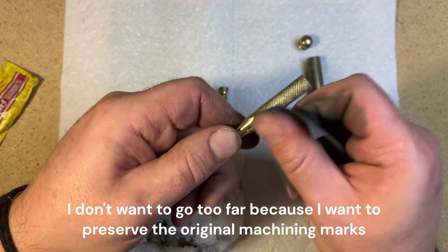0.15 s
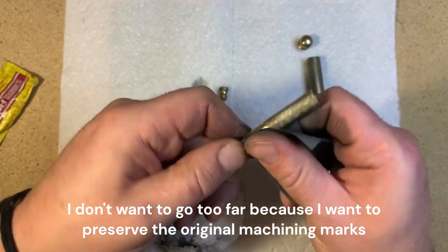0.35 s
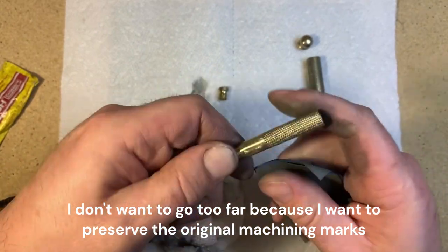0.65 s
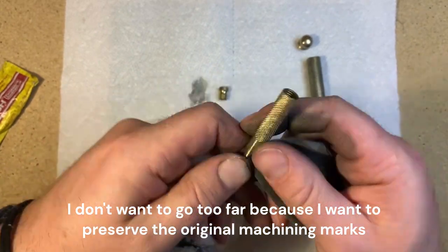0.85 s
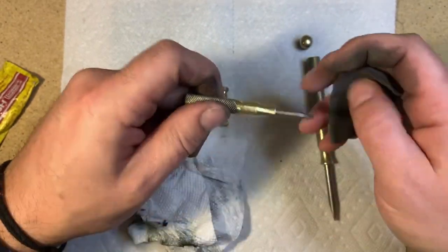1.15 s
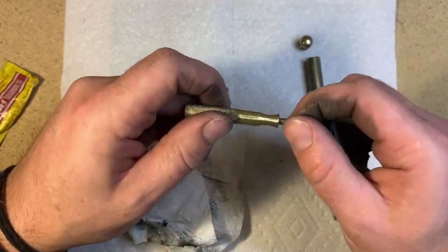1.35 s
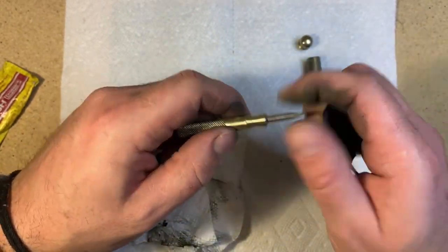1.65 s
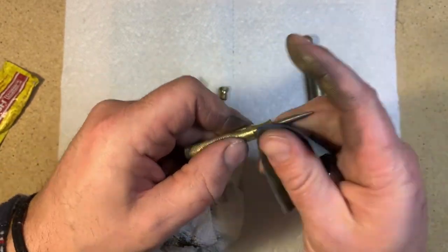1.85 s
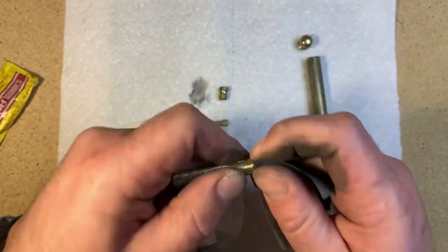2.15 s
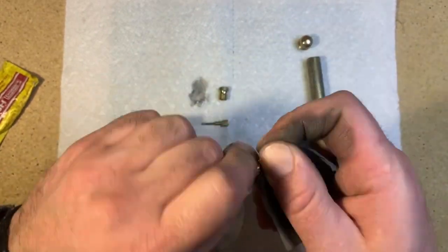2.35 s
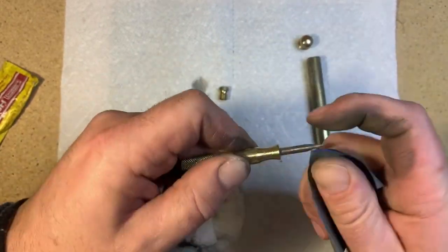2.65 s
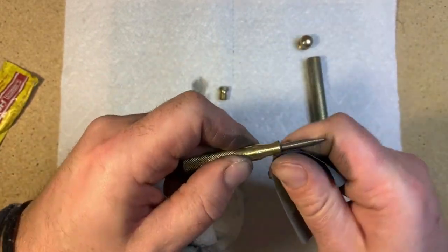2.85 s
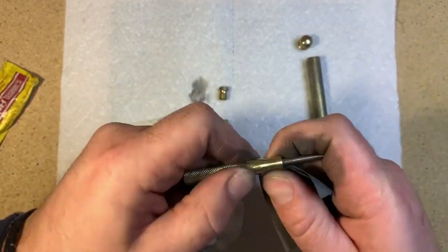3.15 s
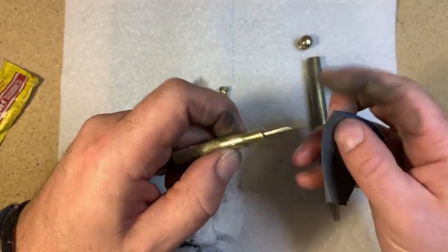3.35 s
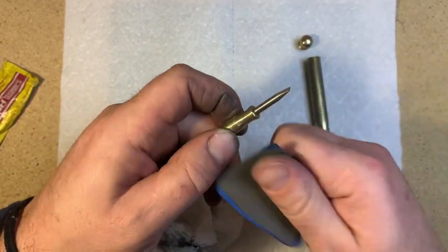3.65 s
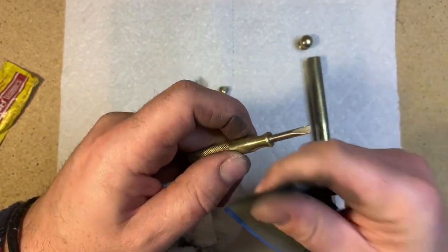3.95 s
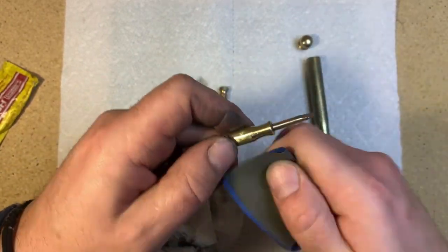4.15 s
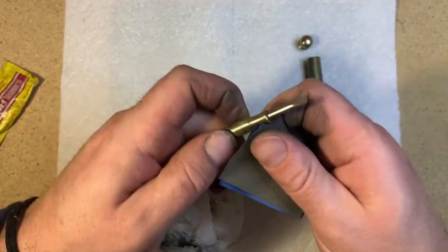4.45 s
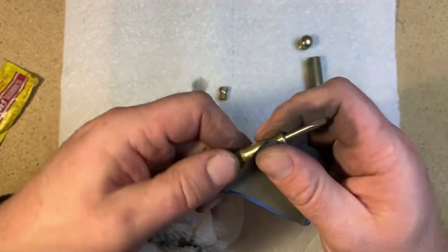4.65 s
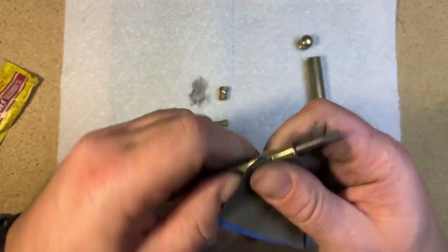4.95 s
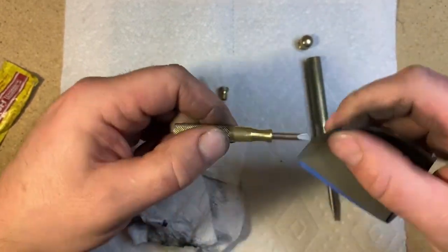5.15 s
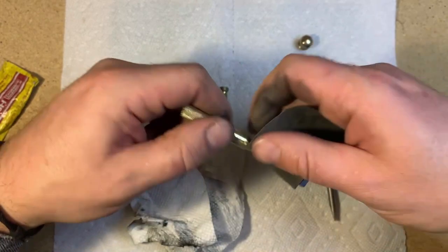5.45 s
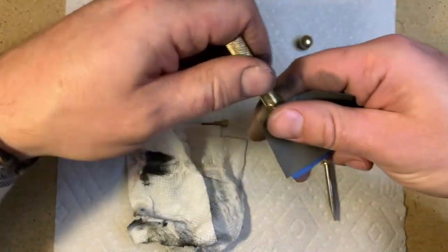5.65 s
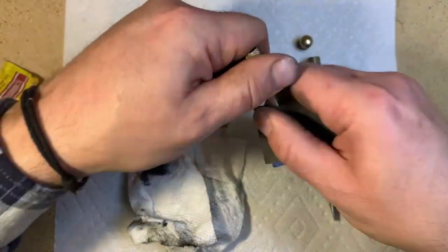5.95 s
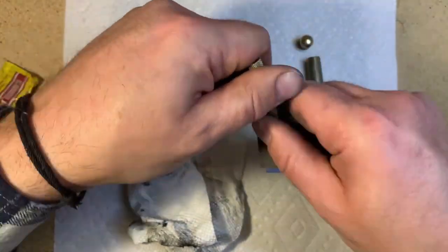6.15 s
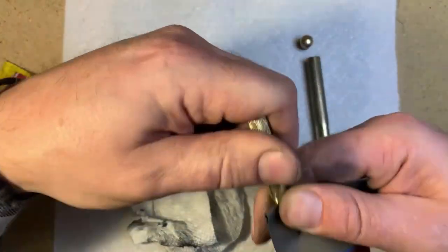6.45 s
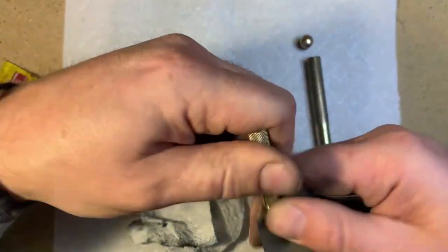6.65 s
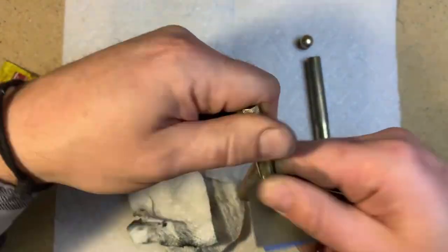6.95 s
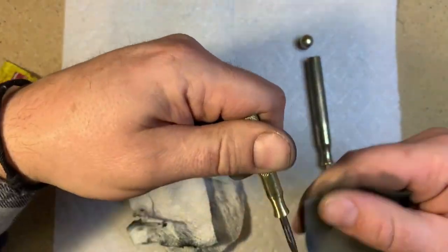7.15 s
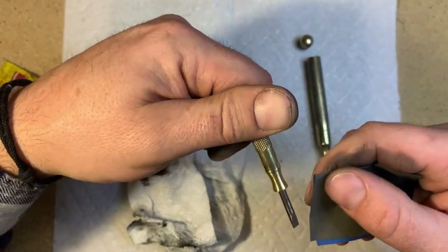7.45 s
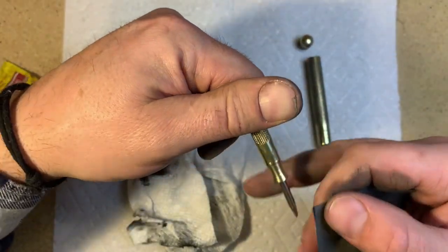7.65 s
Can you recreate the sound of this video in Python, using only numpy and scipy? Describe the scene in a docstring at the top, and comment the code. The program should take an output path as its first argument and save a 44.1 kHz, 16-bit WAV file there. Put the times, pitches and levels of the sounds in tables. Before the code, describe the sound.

Close-up hand sanding of a small brass tool: scratchy bursts, tiny clicks and dull knocks, a short pause, then steady duller strokes that stop.

```python
"""Fine sandpaper is worked over a small brass tool held in the fingers, heard from close by in wide stereo.
A drone, rumble and growl swell first, with an early bench knock; then short scratches bring sharp catches
and taps on the tool. After a short pause the scratching returns, with more catches and knocks, and it turns
to duller, evenly spaced strokes before it stops. A faint tap, then one last catch and tap, end it over hiss.
Noise grains ring the tool and paper, decaying tones make knocks and taps, and tone and noise fill the room."""
import sys
import numpy as np
from scipy import signal
from scipy.fft import rfft, irfft, next_fast_len
from scipy.io import wavfile
from scipy.ndimage import uniform_filter1d

SR = 44100
rng = np.random.default_rng(int(sys.argv[2]) if len(sys.argv) > 2 else 0)


def magnitude_from_level(level_db):
    """Linear magnitude for a level in decibels (20 dB per decade)."""
    exponent = np.asarray(level_db, float) / 20
    return 10 ** exponent


def unload_wav(signal):
    """Save mono or channel-first audio to the path in sys.argv[1] as 16-bit WAV at rate SR, clipped to [-1, 1]."""
    wavfile.write(
        sys.argv[1],
        SR,
        np.round(np.clip(np.atleast_2d(signal).T, -1, 1) * 32767).astype(np.int16),
    )


N = 343097
T = np.arange(N) / SR  # time of each sample in seconds
PAD = next_fast_len(N)
HZ = np.maximum(np.arange(PAD // 2 + 1) * SR / PAD, 1)  # frequencies used by the filters

# Smooth room hiss. Each row: frequency in Hz, level in dB per Hz.
HISS_SPECTRUM = [(250, -97), (350, -107), (900, -111), (1900, -114), (2900, -120), (5800, -126),
                 (9000, -127), (12000, -125), (15000, -128)]
# Swells of the low room layers. Each row: peak in seconds, level in dB, rise in ms, fall in ms.
DRONE_SWELLS = [(0.1, -52.5, 68, 26), (0.3, -43.5, 52, 132), (0.73, -53, 120, 160), (1.2, -66, 65, 100),
                (2.0, -61.5, 60, 27), (2.84, -64, 104, 31), (3.42, -62.5, 72, 53), (4.14, -69, 190, 60),
                (5.1, -70.5, 250, 200)]
RUMBLE_SWELLS = [(0.0, -52.5, 50, 150), (0.32, -58, 100, 120), (0.59, -56, 50, 80), (0.89, -60.5, 101, 120),
                 (1.21, -61, 80, 100), (1.9, -59.5, 60, 100), (2.32, -65.5, 100, 150),
                 (4.44, -61.5, 60, 204.3), (5.1, -62.5, 150, 200)]
GROWL_SWELLS = [(0.08, -57, 150, 130), (0.52, -62, 120, 120), (1.2, -70.5, 292.5, 200), (2.01, -59, 25, 35),
                (2.88, -57, 120, 51), (5.03, -72, 154, 150), (7.21, -68.5, 200, 200)]
# Dull knocks on the bench. Each row: time in seconds (the swell begins 2.8 ms earlier), level in dB, # extra
# level of the lowest modes in dB, length in ms for a mode near 745 Hz.
KNOCKS = [(0.142, -24, -20, 13.7), (0.633, -47, -11, 10), (0.762, -52, -25, 24),
          (2.003, -24.5, -19.5, 13.9), (2.327, -52, -9.5, 15), (2.386, -54.5, -7, 13),
          (2.47, -51.5, -8, 10.5), (3.213, -53, -25, 13), (3.286, -53.5, -9, 8.2), (3.643, -45.5, -16, 14),
          (4.37, -51, -10, 12), (4.45, -44, -25, 7.6), (4.681, -63, -10, 20), (4.925, -47, -8, 15.5),
          (5.006, -26.5, -21, 10.3), (5.783, -61, 1, 19), (6.611, -50, -3.5, 19), (6.984, -61.5, 5.5, 16),
          (7.159, -45.5, -17, 8.3)]
# Tones of the bench. Each row: frequency in Hz, level in dB, share of the knock's extra low level (0 to 1).
BENCH_MODES = [(247, -2.5, 0.7), (342.4, 1, 1), (739, -6.5, 0.09), (547, -10, 0.5), (900, -15.5, 0.03),
               (1290, -21.5, 0.07), (1670, -22.5, 0.2), (2100, -38.5, 0)]
# Taps on the tool. Each row: start in seconds, level in dB.
TAPS = [(0.762, -39), (1.1726, -48), (7.51, -71.5), (7.693, -50)]
# Tones of the tapped tool. Each row: frequency in Hz, level in dB, time to fall by 60 dB in seconds.
TAP_MODES = [(1140, -9, .016), (1647, -0.5, .018), (2070, -5, .014), (3300, -2, .018), (3700, -5, .012)]
# Sandpaper strokes. Each row: middle in seconds, length in ms, scratch level in dB, brightness in dB.
STROKES = [(0.013, 38, -73.5, 13.5), (0.058, 17.5, -61, 11), (0.098, 17, -64, 12.5),
           (0.125, 19, -61.5, 4.5), (0.169, 42, -57, 9), (0.214, 10, -65, 5), (0.257, 75, -61.5, 9),
           (0.383, 55, -57.5, 9.5), (0.46, 31, -52, 7), (0.546, 58, -47.5, 2.5), (0.609, 24.5, -46, 9),
           (0.63, 20, -42.5, 3), (0.682, 47, -69.5, -4.5), (0.765, 13.7, -50, -8.5), (0.854, 13, -66, 10),
           (0.89, 8.1, -58.5, -7), (0.953, 28, -62.5, 2), (0.996, 30, -51, 10.5), (1.072, 13, -45.5, -9.5),
           (1.095, 34, -46.5, -3), (1.125, 14.6, -33.5, -3), (1.165, 44, -50, 7), (1.232, 29, -49, 1),
           (1.683, 50, -55, -2), (1.743, 24, -53, -4.5), (1.767, 44, -54, 8.5), (1.812, 14, -55, -9),
           (1.841, 14, -40, -0.5), (1.883, 11, -76, 15), (1.981, 44, -55.5, 8), (2.038, 44, -52.5, 7),
           (2.106, 33, -56.5, 5.5), (2.164, 33, -52.5, 3.5), (2.218, 29, -43, -13), (2.256, 30, -52.5, -4),
           (2.284, 55, -54.5, 8), (2.332, 11, -41.5, -10.5), (2.353, 33, -52.5, 14.5), (2.39, 4, -39.5, -9),
           (2.422, 48, -51.5, 3.5), (2.487, 34, -47.5, 3), (2.562, 55, -54, -2), (2.644, 57, -69, 7.5),
           (2.722, 38.5, -52, -16), (2.767, 18, -53, -5.5), (2.796, 20, -56.5, -15), (2.823, 22, -60.5, -9),
           (2.862, 33, -51.5, 2), (2.911, 58, -54.5, -9.5), (2.961, 30, -49.5, -4), (3.003, 25, -48, -12.5),
           (3.084, 57, -44, -13), (3.167, 46, -46, 4), (3.213, 16.5, -48, -1.5), (3.254, 15, -63, 4),
           (3.283, 20.4, -50, -2.5), (3.338, 38, -61, 12.5), (3.402, 17, -78, 17.5),
           (3.45, 23.3, -43, -5.5), (3.481, 48, -55, 9), (3.549, 43, -57.5, 5.5), (3.582, 29, -65, 16.5),
           (3.641, 55, -51, 3), (3.696, 50, -55.5, 15), (3.768, 33, -65.5, 22), (3.802, 31, -66, 13),
           (3.915, 31, -75, 24), (4.003, 46, -64, 11), (4.041, 20, -68, -1), (4.081, 38.5, -52.5, -3),
           (4.126, 30, -54, 7.5), (4.182, 46, -53, 0.5), (4.258, 57, -62, 11), (4.308, 35, -58, 16),
           (4.339, 11, -58.5, 0), (4.379, 22.4, -40.5, 4.5), (4.4, 7.2, -47.5, 2), (4.452, 39, -51, 1),
           (4.515, 21, -54, 10), (4.56, 25.5, -56, 1), (4.597, 25, -57.5, 6.5), (4.658, 11, -71, 10),
           (4.712, 50, -45.5, 3.5), (4.809, 90, -54, 2.5), (4.881, 29.4, -46, -6.5), (4.926, 44, -48, 9),
           (4.99, 47.6, -50.5, 3.5), (5.073, 28, -57, 7), (5.109, 41, -53, 1), (5.171, 86, -52.5, 2.5),
           (5.218, 19, -48, -2.5), (5.277, 20, -48.5, -8), (5.316, 41, -47, -0.5), (5.374, 41, -52, -4),
           (5.469, 30, -56.5, 7.5), (5.53, 47, -55, -6), (5.561, 8.2, -62, -15), (5.606, 41, -52, 0),
           (5.655, 19, -65, 3.5), (5.706, 36, -56, 0), (5.788, 35, -39.5, -4), (5.84, 24, -54.5, -23),
           (5.882, 27, -62, -1), (5.944, 38.6, -40.5, -5), (5.998, 17, -53.5, -8), (6.023, 17, -42, -18),
           (6.058, 40, -39, -10), (6.154, 44, -40.5, -10), (6.256, 43.7, -42.5, -8),
           (6.357, 39, -42.5, -5.5), (6.453, 42, -43.5, -7.5), (6.537, 48, -44, -7.5),
           (6.629, 53, -43, -9.5), (6.693, 24, -41.5, -15.5), (6.728, 40, -48, -3.5),
           (6.814, 46, -46.5, -3.5), (6.889, 62, -47.5, -8), (6.976, 71, -53.5, 0), (7.071, 29, -69, 6.5),
           (7.15, 50, -57.5, 5.5), (7.253, 16, -68.5, -2), (7.697, 9.8, -48.5, -4)]
# The paper catches on an edge or lands suddenly. Each row: start in seconds, level in dB, length in ms.
CATCHES = [(0.348, -62, 35), (0.444, -56, 14), (0.6064, -43.5, 0.72), (0.6157, -40.5, 1.5),
           (0.632, -28, 1.3), (0.648, -36, 2.9), (0.763, -25, 0.7), (0.775, -62, 80), (0.845, -67, 36),
           (0.9952, -43, 1.5), (0.9992, -43, 1.4), (1.119, -35, 18), (1.1244, -30.5, 2.3),
           (1.1724, -37, 1.9), (1.739, -42, 9.1), (1.8484, -25, 1.3), (2.204, -40, 30), (2.2546, -33, 2.6),
           (2.327, -43.5, 23), (2.387, -29, 0.84), (2.467, -46.5, 16), (3.213, -32.5, 2.3),
           (3.2906, -35, 1), (3.443, -52, 20), (3.6424, -36, 2.84), (3.895, -66.5, 120), (4.371, -37.5, 25),
           (4.373, -28, 2), (4.3833, -30.5, 1.5), (4.3996, -20.5, 0.83), (4.405, -42, 1.6),
           (4.5039, -42, 0.69), (4.5187, -43, 1.5), (4.6827, -39, 1.9), (4.8917, -34.5, 1.3),
           (5.094, -41, 2.1), (5.196, -34, 1.9), (5.7838, -34, 1.9), (5.7914, -22.5, 1.6),
           (5.803, -32.5, 1.3), (5.949, -33, 0.76), (6.019, -49.5, 8), (6.047, -41, 1.5),
           (6.0572, -53, 1.2), (6.6102, -40, 1.2), (6.79, -31.5, 1.5), (6.808, -41, 1.3),
           (7.1593, -40, 1.1), (7.693, -43, 14), (7.715, -60, 30)]
# Resonances of hand, tool and folded paper, by band. Each row: frequency in Hz, width in Hz, level in dB.
TOOL_BANDS = {"cavity": [(520, 1000, -1.5), (1277, 720, -7)], "low scrape": [(1904, 740, 0.5)],
              "rasp": [(2977, 970, -1)], "scratch": [(3674, 830, -7.5), (4040, 960, -6.5)],
              "upper": [(5270, 1800, -8), (6180, 2260, -5.5), (6810, 2240, -6.5)], "top": [(8990, 3350, -5),
              (10160, 2800, -4.5), (12230, 2200, -5.5), (14500, 1800, -12.5), (15260, 1500, -8.5)]}
# How the hands hold tool and paper. Each row: time in seconds, cupping in dB (each lower band takes # its own
# share), angle of the tool in dB.
GRIP = [(0.0, 3, 6.5), (0.4, 2.5, 0.5), (0.76, 4, -3), (1.2, -2.5, 1), (1.9, 0, 0.5), (2.5, -1, -3),
        (2.9, -5, -4.5), (3.25, -1.5, -2.5), (3.6, 2, 1), (4.1, 3, 1.5), (4.4, 3.5, 1), (4.7, 5, 1.5),
        (5.2, 0, 3), (5.55, 0, 2.5), (5.9, -0.5, 3), (6.4, -1.5, 7), (6.8, -1.5, 8), (7.2, 5, -0.5),
        (7.7, -3, 1)]
# Right channel against left, on top of a plain delay. Each row: frequency in Hz, phase lead in radians.
CHANNEL_LEAD = [(20, 0), (120, .4), (260, 1.5), (700, 2.1), (2100, 2.2), (2400, 2.3), (3300, 3.75),
                (16000, 3.85)]
# Right channel against left. Each row: frequency in Hz, level difference in dB.
CHANNEL_DB = [(20, 0), (280, -1), (450, 0), (800, 3), (1100, 1.2), (2300, 2.2), (4200, .1), (16000, 0)]
# Random wander of the phase between the channels, most in the middle frequencies.
# Each row: frequency in Hz, level of the wandering part in dB against the sanding and room sound.
PHASE_WANDER = [(20, -29.5), (400, -4.5), (1200, 1.5), (1800, -3), (2300, -1.5), (4000, -18.5), (9000, -22),
                (16000, -26)]


def on_hz(table):
    """Read a (Hz, value) table on a log-frequency axis."""
    hz, value = np.transpose(table)
    return np.interp(np.log(HZ), np.log(hz), value)


def shape(x, gain):
    """Filter by a complex gain per frequency."""
    return irfft(rfft(x, PAD) * gain, PAD)[..., :N]


def ring(x, modes):
    """Ring steep resonances that answer only after the push; white noise of rms 1 comes out near rms 1."""
    gain = 0
    for k, (hz, width, db) in enumerate(modes):
        # neighbouring modes take opposite signs
        gain = gain + (-1) ** k * magnitude_from_level(db) / (1 + 1j * (HZ - hz * hz / HZ) / width) ** 2
    return shape(x, gain / np.sqrt(np.mean(abs(gain) ** 2)))


def walk(rate):
    """Random levels, `rate` of them a second, smoothed twice; their spread is near 1."""
    hold = int(SR / rate)
    steps = np.repeat(rng.standard_normal(N // hold + 1), hold)
    return 1.09 * uniform_filter1d(uniform_filter1d(steps, hold), hold)[:N]


def swelling(rest_db, wander_db, swells):
    """Gain that wanders about a slowly falling resting level and swells now and then."""
    fade_db_per_s = 0.44
    power = magnitude_from_level(rest_db - fade_db_per_s * T + wander_db * walk(4.5)) ** 2
    for at, db, rise, fall in swells:
        ms = 1000 * (T - at)
        power = power + magnitude_from_level(db) ** 2 * np.exp(-(ms / np.where(ms < 0, rise, fall)) ** 2)
    return np.sqrt(power)


def room():
    """A narrow wavering drone, deep rumble and growl come and go as resonant noise and tone, over smooth hiss."""
    drone_hz = 87 + 6.0 * walk(14)
    drone = np.sqrt(2) * np.sin(2 * np.pi * np.cumsum(drone_hz) / SR) * magnitude_from_level(2.3 * walk(16))
    rumble = ring(rng.standard_normal(N), [(64.3, 30.6, 12), (33, 23, -6.5)])
    growl = ring(rng.standard_normal(N), [(134.5, 59, 6.0), (205.2, 80, -4.5)])
    low = swelling(-72.5, 1.5, DRONE_SWELLS) * drone
    low = low + swelling(-64.5, 1.5, RUMBLE_SWELLS) * rumble
    low = low + swelling(-70, 1, GROWL_SWELLS) * growl
    low_cut = np.minimum(HZ / 250, 1) ** 2
    hiss = shape(rng.standard_normal(N), magnitude_from_level(on_hz(HISS_SPECTRUM)) * np.sqrt(SR / 2) * low_cut)
    return low + hiss * magnitude_from_level(1.3 * walk(6))


def bench():
    """Soft knocks: the modes swell during the push and the resting arms damp them, the lowest last."""
    push_ms, rise_ms, linger = 2.8, 5.1, 0.26  # linger: how much longer low modes last
    out = np.zeros(N)
    t = np.arange(int(.05 * SR)) / SR
    ms = 1000 * t
    for at, db, low_db, length_ms in KNOCKS:
        start = int((at - push_ms / 1000) * SR)
        for k, (hz, mode_db, low_share) in enumerate(BENCH_MODES):
            damping = np.exp(-(ms / max(length_ms, 3) * (hz / 745) ** linger) ** 3.0)
            swell = np.minimum(ms / rise_ms, 1) * damping
            gain = (-1) ** k * magnitude_from_level(db + mode_db + low_share * low_db)
            out[start:start + len(t)] += gain * swell * np.sin(2 * np.pi * hz * t)
    return out


def taps():
    """Each tap in the fingers rings the damped modes of the held tool."""
    out = np.zeros(N)
    t = np.arange(int(.06 * SR)) / SR
    tap = sum(magnitude_from_level(db - 60 * t / t60) * np.sin(2 * np.pi * hz * t) for hz, db, t60 in TAP_MODES)
    for at, db in TAPS:
        start = int(at * SR)
        out[start:start + len(t)] += magnitude_from_level(db) * tap
    return out


def grit():
    """Dense grains of uneven size, in patches as the paper grips and lets go; rms 1."""
    scatter_db, patchy_db = 2.5, 2.0
    grain_db = scatter_db * rng.exponential(size=N) + patchy_db * walk(300)
    grains = rng.standard_normal(N) * magnitude_from_level(grain_db)
    return grains / np.sqrt(np.mean(grains ** 2))


def pressure():
    """Power with which the grit bites: broad-topped strokes that start and stop quickly, and catches."""
    strokes, catches = np.zeros(N), np.zeros(N)
    for at, length_ms, db, _ in STROKES:
        near = slice(max(int((at - .15) * SR), 0), int((at + .15) * SR))
        ms = 1000 * (T[near] - at)
        # the ends of the stroke's length lie about 6 dB below its middle
        strokes[near] += magnitude_from_level(db - 6.04 * abs(2 * ms / max(length_ms, 2)) ** 3.65) ** 2
    for at, db, length_ms in CATCHES:
        near = slice(int((at - .002) * SR), int((at + .09) * SR))
        ms = 1000 * (T[near] - at)
        # a catch snaps free at once, then dies away over its length
        fall = np.where(ms < 0, ms / 0.036, -ms / max(length_ms / 4, .05))
        catches[near] += magnitude_from_level(db) ** 2 * np.exp(fall)
    return strokes, catches


def snaps():
    """The brief catches let go with one sharp step in force."""
    crisp_db, brief_ms = 7.5, 3.0
    at, db, length_ms = np.transpose(CATCHES)
    out = np.zeros(N)
    out[(at * SR).astype(int)] = magnitude_from_level(db + crisp_db) * (length_ms < brief_ms)
    return out


def sliding(strokes):
    """The paper stays in light contact only where one stroke has just ended and the next is near."""
    slide_db, reach_ms = -6.5, 18
    keep = np.exp(-1000 / (reach_ms * SR))
    after = signal.lfilter([1 - keep], [1, -keep], strokes)
    before = signal.lfilter([1 - keep], [1, -keep], strokes[::-1])[::-1]
    return magnitude_from_level(2 * slide_db) * np.minimum(after, before)  # doubled because this is power


def band_levels():
    """Brightness, pressure and grip shift the weight between the resonances; dB for each band."""
    at, _, level_db, bright_db = np.transpose(STROKES)
    grip_at, cupping_db, angle_db = np.transpose(GRIP)
    extra = np.interp(T, at, level_db + 50)  # pressure against an ordinary stroke at -50 dB
    bright = np.interp(T, at, bright_db)
    cupping = np.interp(T, grip_at, cupping_db)
    # harder pressure favours the scratch over the lower bands; cupping lifts the lower bands
    return {"cavity": -21 - 0.28 * extra + 1.5 * cupping,
            "low scrape": -17.5 - 0.19 * extra + 0.6 * cupping,
            "rasp": -11.5 - 0.29 * extra + 0.18 * cupping,
            "scratch": 0,
            "upper": 0.62 * bright + np.interp(T, grip_at, angle_db),
            "top": bright}


def sanding():
    """The grit's strokes, catches and light slides ring tool and paper, with an echo from the bench top."""
    patchy_db, light_treble_db, snap_body_db = 2.15, -9.5, 3.5
    levels = band_levels()
    grains = grit()
    strokes, catches = pressure()
    light, snap = sliding(strokes), snaps()
    out, sign = 0, 1
    for band, modes in TOOL_BANDS.items():
        # light sliding is duller than a pressed stroke
        light_db = light_treble_db if band in ("upper", "top") else 0
        # a snap rings the lowest resonances harder than grit does
        snap_db = snap_body_db if band in ("cavity", "low scrape") else 0
        power = strokes + catches + light * magnitude_from_level(2 * light_db)
        bite = snap * magnitude_from_level(snap_db) + grains * np.sqrt(power)
        for hz, width, db in modes:
            push = bite * magnitude_from_level(db + levels[band] + patchy_db * walk(35))
            out = out + sign * ring(push, [(hz, width, 0)])
            sign = -sign
    # the bench top below throws back an echo whose path changes as the hands move
    lag_s = (1.313 + .3 * walk(8)) / 1000
    return out + magnitude_from_level(-10.0) * np.interp(T - lag_s, T, out)


def scene():
    """One mono sound is widened to two channels, the right delayed and phase-shifted, with random wander."""
    airborne = sanding() + room()
    # the phase between the channels wanders at random, most in the middle frequencies
    wander = shape(airborne, 1j * magnitude_from_level(on_hz(PHASE_WANDER))) * walk(30)
    sound = airborne + bench() + taps()
    # the plain delay makes one full turn of phase every 4250 Hz
    lag = np.exp(1j * (on_hz(CHANNEL_LEAD) - 2 * np.pi * HZ / 4250))
    tilt = magnitude_from_level(on_hz(CHANNEL_DB) / 2)  # half the level difference goes to each channel
    left = shape(sound + wander, 1 / tilt)
    right = shape(sound - wander, tilt * lag)
    return np.array([left, right])


def band_limit(x):
    """A steep low-pass at the top of the band."""
    return signal.sosfilt(signal.butter(12, 16990, fs=SR, output="sos"), x)


def record(dry):
    """Each channel adds its own faint hiss; the very top is shelved off steeply."""
    noisy = dry + magnitude_from_level(-92.5) * rng.standard_normal(dry.shape)
    # falls by 17 dB from 15750 to 15950 Hz, with nothing kept from 16550 Hz up
    shelf = magnitude_from_level(-17 * np.clip((HZ - 15750) / 200, 0, 1)) * (HZ < 16550)
    mix = shape(noisy, shelf)
    return band_limit(mix)


dry = scene()
out = record(dry)
unload_wav(out)
```